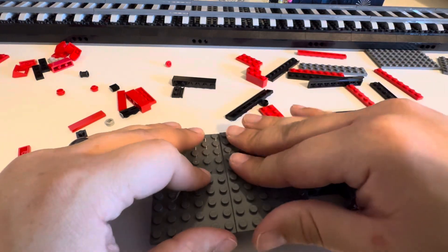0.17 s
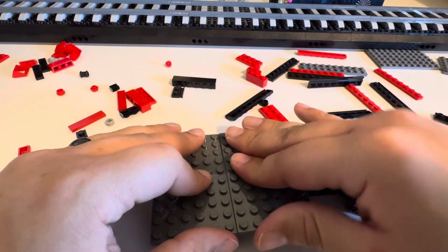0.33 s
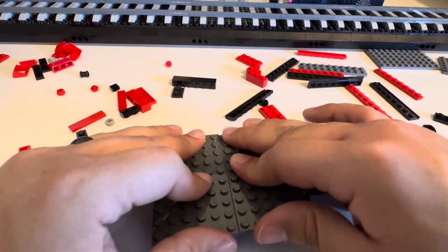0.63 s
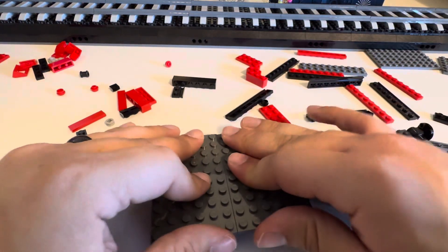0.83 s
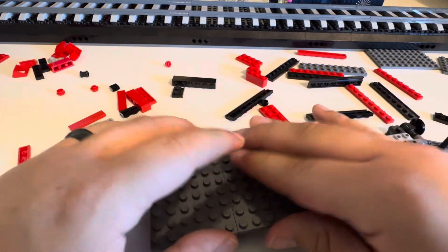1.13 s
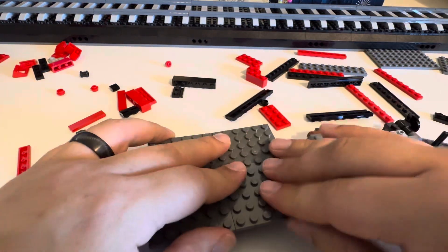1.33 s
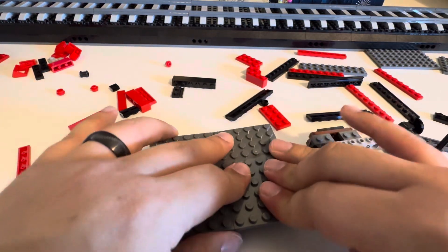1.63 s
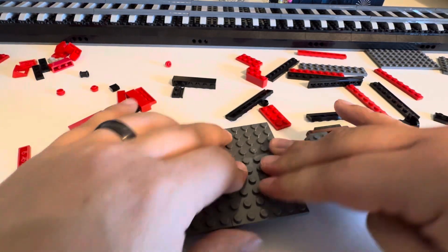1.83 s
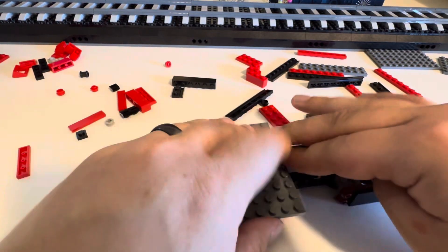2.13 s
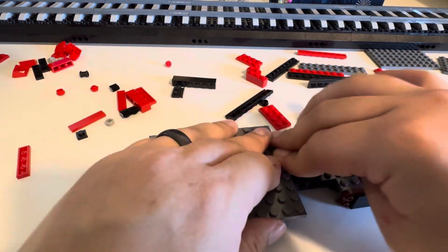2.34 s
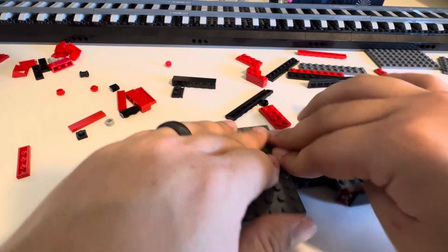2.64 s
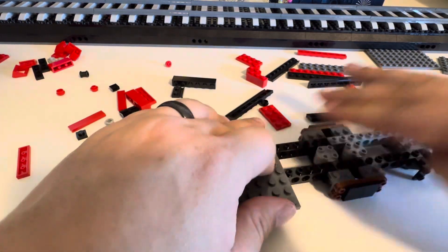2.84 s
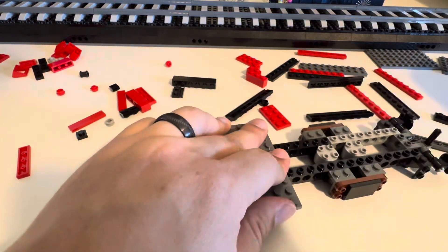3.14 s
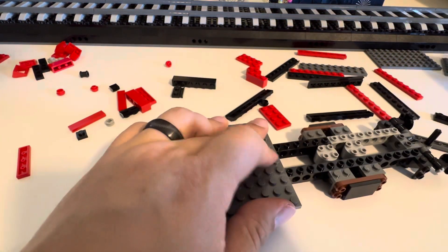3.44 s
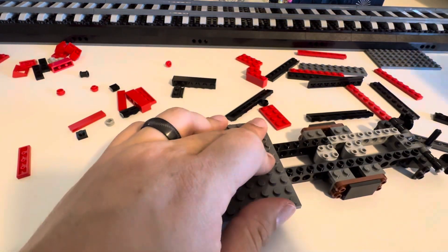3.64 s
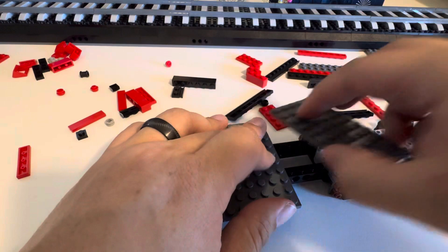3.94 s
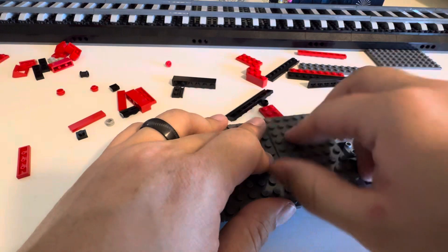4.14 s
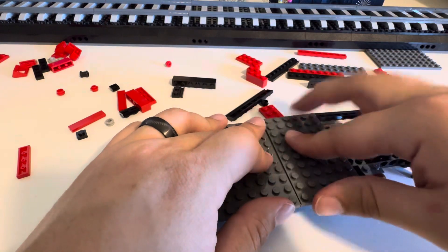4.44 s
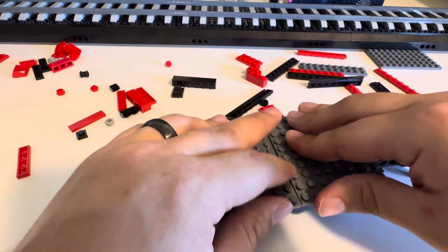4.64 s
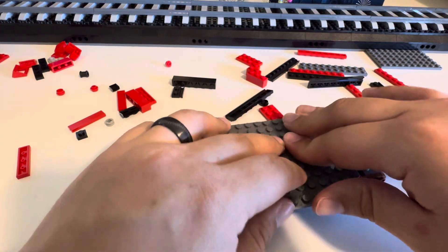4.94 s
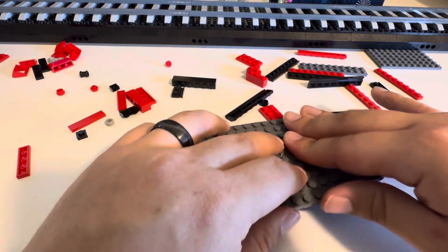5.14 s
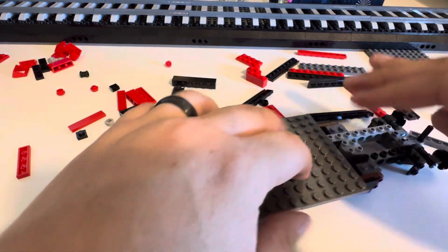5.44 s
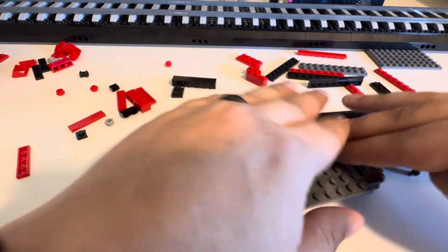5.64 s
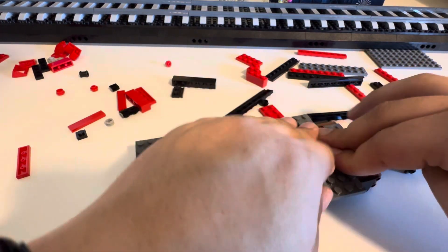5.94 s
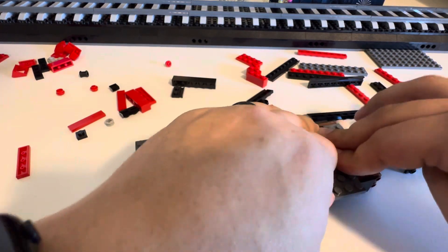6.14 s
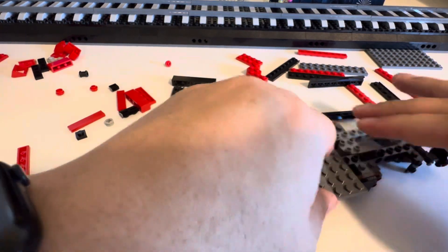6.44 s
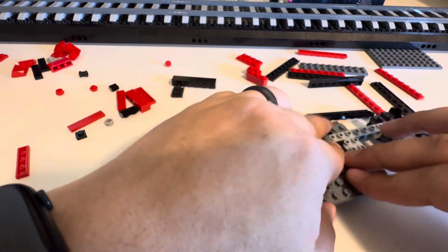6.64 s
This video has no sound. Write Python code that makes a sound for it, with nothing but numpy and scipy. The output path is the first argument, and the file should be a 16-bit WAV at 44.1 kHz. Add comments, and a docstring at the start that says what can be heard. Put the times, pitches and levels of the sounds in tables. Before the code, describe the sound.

A close stereo microphone in a quiet, small room picks up hands fitting plastic plates onto a hollow toy frame. A loud crisp snap comes early, then soft touches, rubs and little ticks. Past the middle a plate lands with a clustered clatter, then a firm thuddy snap follows, and later a lower double knock. Faint handling continues to the end over a low, steady room hush.

```python
"""A small, bare room: at a table, two hands press plastic building plates onto a half-built toy frame.
A stereo microphone stands close by. Studs snap home as noisy bursts of contact that ring plates and frame.
In between, fingers rub as shaped friction noise, plate edges scuff in short rings and a loose piece pings.
Bumps swing the modes of the table top. The room answers with echoes and a decaying tail, over a still floor."""
import sys
import numpy as np
from scipy import signal
from scipy.fft import rfft, irfft, next_fast_len
from scipy.io import wavfile
from scipy.ndimage import uniform_filter1d

SR = 44100
rng = np.random.default_rng(int(sys.argv[2]) if len(sys.argv) > 2 else 0)


def output_pcm(signal):
    """Save a mono or channel-first signal as 16-bit PCM at the path in sys.argv[1].

    Samples are clipped to [-1, 1] before scaling.
    """
    pcm = np.clip(np.atleast_2d(signal).T, -1, 1) * 32767
    wavfile.write(sys.argv[1], SR, np.round(pcm).astype(np.int16))


N = 299439

# a finger lands on the plates and slides; levels are relative, each layer is trimmed later:
# (t/s, length/s, frame body level/dB, plate rasp level/dB, skin hiss level/dB)
FINGER_STROKES = [(0.0, 0.0057, -39.5, -37.5, -65), (0.134, 0.033, -55.5, -59.5, -72),
                  (0.327, 0.01, -55.5, -64.5, -101), (0.392, 0.025, -53, -57.5, -70),
                  (0.509, 0.07, -61, -67, -101), (0.961, 0.04, -43.5, -61.5, -68.5),
                  (1.053, 0.012, -38, -45.5, -73), (1.095, 0.059, -62, -57, -62.5),
                  (1.285, 0.039, -47, -45, -57.5), (1.404, 0.0063, -64.5, -55, -63),
                  (1.612, 0.078, -59.5, -63, -68), (1.7806, 0.097, -47.5, -55.5, -65),
                  (1.931, 0.024, -47, -63, -84), (2.007, 0.05, -43, -57, -68.5),
                  (2.062, 0.041, -52, -61, -64), (2.104, 0.01, -46.5, -49, -72),
                  (2.161, 0.052, -52, -63, -74), (2.429, 0.058, -51.5, -58.5, -93),
                  (2.665, 0.051, -40.5, -47.5, -60.5), (2.7443, 0.04, -39.5, -48.5, -71.5),
                  (3.022, 0.044, -58.5, -57, -83), (3.284, 0.085, -62.5, -68.5, -75),
                  (3.415, 0.057, -54.5, -80, -84), (3.496, 0.015, -87, -70, -64.5),
                  (4.235, 0.043, -72.5, -60, -70), (4.334, 0.05, -55.5, -78, -103),
                  (4.436, 0.0051, -45, -49.5, -88), (4.782, 0.14, -54.5, -67, -80),
                  (5.09, 0.076, -68, -61, -75), (5.182, 0.082, -40, -49, -66),
                  (5.305, 0.12, -55.5, -62, -71), (5.439, 0.012, -42.5, -46.5, -108),
                  (5.909, 0.052, -57.5, -67, -72), (6.038, 0.031, -44, -56.5, -99),
                  (6.176, 0.063, -54, -64, -91), (6.275, 0.054, -37.5, -48, -73),
                  (6.373, 0.059, -56, -75, -91), (6.4555, 0.11, -55, -57.5, -65),
                  (6.546, 0.023, -43, -52, -72), (6.635, 0.14, -75, -62, -76)]


def amp(db):
    """Decibels to gain."""
    return 10 ** (np.asarray(db) / 20)


def evened(x):
    """Scales to rms 1."""
    return x / np.sqrt(np.mean(x ** 2) + 1e-20)


def read(points, hz):
    """Reads a curve of (frequency, value) on a log-frequency axis."""
    f, value = np.transpose(points)
    return np.interp(np.log(hz + 1), np.log(f + 1), value)


def add(mix, s, sound):
    """Mixes a sound in at time s."""
    part = mix[:, max(round(s * SR), 0):][:, :sound.shape[-1]]
    part += sound[..., :part.shape[1]]


def colour(x, points):
    """Causal, minimum-phase filter with the given spectrum."""
    log_gain = np.log(amp(read(points, abs(np.fft.fftfreq(4096, 1 / SR)))))
    minimum_phase = np.exp(np.conj(signal.hilbert(log_gain)))
    taps = np.fft.ifft(minimum_phase).real
    return signal.oaconvolve(x, taps[None], axes=1)[:, :x.shape[1]]


def diffuse(x):
    """Two unrelated signals become alike in the bass, as at two nearby microphone ports."""
    # diffuse sound at the two ports: (f/Hz, left-right likeness from 0 to 1)
    port_likeness = [(50, 0.98), (130, 0.63), (280, 0.24), (550, 0), (1200, 0), (16000, 0)]
    size = next_fast_len(x.shape[1])
    a, b = rfft(x, size)
    same = np.clip(read(port_likeness, np.fft.rfftfreq(size, 1 / SR)), -1, 1)
    mid = a * np.sqrt((1 + same) / 2)
    side = b * np.sqrt((1 - same) / 2)
    return irfft(np.array([mid + side, mid - side]), size)[:, :x.shape[1]]


def ring(modes, t, scatter):
    """Damped modes, with random sign, tuning (by the given fraction) and strength (by 2 dB)."""
    hz, db, t60 = np.transpose(modes)[:, :, None]
    tune, strength = rng.standard_normal((2, len(modes), 1))
    sign = rng.choice([-1, 1], (len(modes), 1))
    decay = amp(db + 2 * strength - 60 * t / t60)
    return (sign * decay * np.sin(2 * np.pi * hz * (1 + scatter * tune) * t)).sum(0)


def resonate(x, hz, sharpness, boost_db):
    """Adds a resonance at hz to the sound; sharpness is its Q."""
    b, a = signal.iirpeak(np.clip(hz, 100, SR / 4), max(sharpness, 1), fs=SR)
    return x + amp(boost_db) * signal.lfilter(b, a, x)


def still_room(level_db=-66.5):
    """The floor of the still room: steady shaped noise, alike at both ports in the bass."""
    # shape of the floor, before it is set to level_db: (f/Hz, relative level per Hz/dB)
    floor_spectrum = [(15, -41), (25, 2), (117, 1), (161, -13.5), (242, -13.5), (734, -23), (2990, -23.5),
                      (3820, -28.5), (4140, -25), (7110, -31), (9840, -32.5), (14800, -44), (16000, -37)]
    noise = diffuse(rng.standard_normal((2, N)))
    return amp(level_db) * evened(colour(noise, floor_spectrum))


def echoes(size):
    """Dull single echoes from the nearest walls, left and right by turns."""
    # first echoes, before the colouring below: (delay/s, level/dB)
    wall_echoes = [(.0125, -13), (.0195, -20.5), (.0245, -16.5)]
    # what the walls do to an echo: (f/Hz, level/dB)
    wall_colour = [(60, 4.5), (300, 5), (900, -5), (2000, -5), (5000, -19.5), (15000, -30)]
    taps = np.zeros((2, size))
    for k, (s, db) in enumerate(wall_echoes):
        near, far = k % 2, 1 - k % 2
        taps[near, round(s * SR)] = amp(db)
        taps[far, round(s * SR) + 12] = amp(db)  # 12 samples later at the far port
    return colour(taps, wall_colour)


def room(x, first_s=0.0062, build_s=0.0067, standing_db=-58):
    """Reflections arrive from the walls in uneven clusters and die band by band; a few low tones hang on."""
    # the diffuse tail: (f/Hz, relative level/dB, t60/s)
    tail_bands = [(62.6, 11, 0.38), (122, 5.5, 0.94), (168, -5.5, 0.52), (234, 7, 0.15), (506, -9.5, 0.89),
                  (810, 3, 0.1), (1055, -2, 0.59), (2100, -6.5, 0.5), (3130, -7.5, 0.49), (5130, -10, 0.5),
                  (9100, -4.5, 0.43), (11300, -15, 0.37), (15000, -22.5, 0.3)]
    # standing waves between the walls, trimmed by standing_db: (f/Hz, relative level/dB, t60/s)
    standing_waves = [(106, -6.5, 0.22), (191.2, -3, 0.67), (284.8, -6.5, 0.57), (389, -3.5, 0.6),
                      (443, -1, 0.59), (520, -12.5, 1), (587, -6, 0.058)]
    t = np.arange(SR * 3 // 4) / SR
    noise = diffuse(rng.standard_normal((2, len(t)))) / np.sqrt(SR)
    hz, frame_s, z = signal.stft(noise, SR, nperseg=512)
    t60 = read([(f, decay) for f, _, decay in tail_bands], hz)[:, None]

    # clusters: 1.8 dB patches in time and frequency, 1.3 dB from frame to frame
    patches = uniform_filter1d(rng.standard_normal(z.shape[1:]), size=5, axis=0)
    patches = uniform_filter1d(patches, size=3, axis=1)
    z *= evened(amp(1.8 * evened(patches) + 1.3 * rng.standard_normal(len(frame_s))))
    # the root keeps a band's energy independent of its decay time
    z *= amp(-60 * frame_s / t60) * np.sqrt(2 * np.log(1000) / t60)

    arrival = 1 - np.exp(-np.maximum(t - first_s, 0) / build_s)
    tail = signal.istft(z, SR, nperseg=512)[1][:, :len(t)] * arrival
    tail = colour(tail, [(f, db) for f, db, _ in tail_bands])
    tail += amp(standing_db) * ring(standing_waves, t, scatter=0) * arrival
    return signal.oaconvolve(x, tail + echoes(len(t)), axes=1)[:, :N]


def bumps(level_db=-7, push_db=-7, rise_s=0.0034):
    """Soft pushes of the frame and of landing fingers set the table top swinging."""
    # the frame bumps the table, trimmed by level_db: (t/s, relative peak level/dB)
    frame_bumps = [(0.638, -18), (0.972, -39), (1.072, -34), (1.294, -31.5), (1.592, -33), (1.795, -35.5),
                   (1.923, -40), (2.176, -33.5), (2.205, -32), (3.41, -43), (4.1, -28), (4.319, -36.5),
                   (4.443, -44), (4.613, -46), (4.811, -21), (5.2, -40), (5.24, -34.5), (5.646, -26.5),
                   (6.173, -41.5), (6.313, -33.5), (6.561, -29.5)]
    # modes of the table top: (f/Hz, relative level/dB, t60/s)
    table_modes = [(62, -14.5, 0.37), (92.4, 2, 0.1), (115.2, 0.5, 0.22), (192, -16.5, 0.029),
                   (258, -21.5, 0.02)]
    out, t = np.zeros((2, N)), np.arange(SR // 3) / SR
    # a finger's push is set against its stroke's body level
    landings = [(s, body_db + push_db) for s, _, body_db, *_ in FINGER_STROKES]
    for s, db in list(frame_bumps) + landings:
        swing = ring(table_modes, t, scatter=0.0088) * (1 - np.exp(-t / rise_s))
        add(out, s, amp(db + level_db) * swing / abs(swing).max())
    return out


def friction(per_s, spread_db, smooth):
    """Skin catches and lets go on the studs: slips of uneven size over a smooth drag."""
    sizes = amp(spread_db * np.minimum(rng.exponential(1, N), 4))
    slips = (rng.random(N) < per_s / SR) * sizes
    catches = evened(slips * rng.standard_normal((2, N)))
    return evened(catches + smooth * rng.standard_normal((2, N)))


def hollow(x, ring_s=0.019, ring_db=-3, half_turns_per_s=2.7):
    """The frame's crowded modes colour the rubbing; three sets trade places as the fingers move over it."""
    t, out = np.arange(2048) / SR, np.zeros_like(x)
    for k in range(3):
        modes = rng.standard_normal(len(t)) * np.exp(-t / ring_s)
        rung = signal.oaconvolve(x, modes[None] / np.linalg.norm(modes), axes=1)[:, :N]
        out += rung * np.cos(np.pi * (half_turns_per_s * np.arange(N) / SR + k / 3))
    return x + amp(ring_db) * out


def lumps(depth_db, lump_s):
    """The drag comes in lumps as the fingers ride over rows of studs."""
    knots = np.arange(0, N / SR + lump_s, lump_s)
    heights = np.clip(rng.standard_normal(len(knots)), -2, 2)
    return amp(depth_db * np.interp(np.arange(N) / SR, knots, heights))


def pressure(length_s, attack_s=0.0014, sag_db=-4.5, release_db_per_s=238.5):
    """A finger grips quickly, eases off as it slides and lets go."""
    t = np.arange(SR // 2) / SR
    eased_db = sag_db * np.minimum(t / length_s, 1)
    eased_db -= release_db_per_s * np.maximum(t - length_s, 0)
    return (1 - np.exp(-t / attack_s)) * amp(eased_db)


def murmur(start_hz=480, end_hz=270, settle_s=0.036, width_hz=130):
    """The frame's main resonance, driven by noise, sinks as each fingertip settles on it."""
    t, hz = np.arange(N) / SR, np.zeros(N)
    for s, *_ in FINGER_STROKES:
        since = t[t >= s] - s
        hz[t >= s] = end_hz + (start_hz - end_hz) * np.exp(-(since / settle_s) ** 2)
    # a double low-pass pole, each of width_hz, then shifted up to the moving pitch
    r = np.exp(-np.pi * width_hz / SR)
    swing = rng.standard_normal((2, N)) + 1j * rng.standard_normal((2, N))
    swing = signal.lfilter([1], [1, -2 * r, r * r], swing)
    tone = (swing * np.exp(2j * np.pi * np.cumsum(hz) / SR)).real
    return evened(diffuse(tone))


def rubs(body_db=-5.5, murmur_db=-6, rasp_db=-3, hiss_db=0):
    """Sliding fingers make the hollow frame murmur, the plates rasp and the skin hiss."""
    # spectra of frame body, plate rasp and skin hiss: (f/Hz, relative level per Hz/dB)
    body_spectrum = [(40, -41.5), (110, 6), (165, -4.5), (240, -8.5), (290, 14.5), (350, -2.5), (560, 5.5),
                     (760, 0.5), (1600, -34.5), (4000, -70)]
    rasp_spectrum = [(300, -33), (700, -18), (860, -8), (1050, 13), (1250, 0), (1550, -6.5), (2400, -0.5),
                     (2900, -12.5), (4500, -15.5), (8000, -25.5), (16000, -43)]
    hiss_spectrum = [(900, -17), (2500, -6.5), (4500, 10), (7000, 1.5), (9500, 5.5), (11500, 3.5),
                     (14200, -1), (16000, -5)]
    gains = np.zeros((3, N))
    for s, length_s, *levels_db in FINGER_STROKES:
        add(gains, s, amp(levels_db)[:, None] * pressure(length_s))
    body, rasp, hiss = gains
    body, rasp = np.array([body, rasp]) * evened(lumps(depth_db=3.2, lump_s=.016))

    drag = hollow(diffuse(friction(per_s=300, spread_db=-0.5, smooth=0.14)))
    catches = hollow(diffuse(friction(per_s=260, spread_db=2.5, smooth=.3)))
    fine = friction(per_s=600, spread_db=0.0, smooth=0.6)
    frame = amp(body_db) * evened(colour(drag, body_spectrum)) + amp(murmur_db) * murmur()
    plates = amp(rasp_db) * evened(colour(catches, rasp_spectrum))
    skin = amp(hiss_db) * evened(colour(fine, hiss_spectrum))
    return body * frame + rasp * plates + hiss * skin


def scuffs(slips_per_s=330, unevenness=0.39, sharpness=6, sag=0.15):
    """A skidding edge sticks and slips in uneven steps; each slip rings the plate, lower as it slows."""
    # a plate's edge skids over studs and sings: (t/s, length/s, middle pitch f/Hz, rms level/dB)
    edge_skids = [(0.0, 0.035, 2310, -59.5), (1.049, 0.021, 2850, -56.5), (1.411, 0.014, 3270, -57.5),
                  (1.78, 0.026, 726, -52), (5.22, 0.024, 1588, -57.5), (5.238, 0.3, 1000, -72.5),
                  (5.267, 0.2, 2090, -74), (5.388, 0.16, 302, -59), (5.434, 0.041, 890, -61),
                  (5.451, 0.023, 1660, -60), (6.275, 0.026, 3260, -64)]
    out = np.zeros((2, N))
    t = np.arange(1024) / SR
    for s, length_s, hz, db in edge_skids:
        skid = np.zeros((2, round(length_s * SR) + len(t)))
        gaps, sizes, detune, pan = rng.standard_normal((4, 200))
        # places run from 0 to 1 along the skid
        places = np.cumsum(np.exp(unevenness * gaps)) / (slips_per_s * length_s)
        for place, size, tune, side in zip(places[places < 1], sizes, detune, pan):
            ring_hz = hz * (1 - sag * (place - .5) + .04 * tune)
            phase = 2 * np.pi * ring_hz * t + np.array([[.5], [-.5]]) * side
            fade = np.exp(-np.pi * hz * t / sharpness) * (1 - np.exp(-2 * hz * t))
            strength = np.sqrt(np.sin(np.pi * place)) * amp(2 * size)
            add(skid, place * length_s, strength * np.sin(phase) * fade)
        rms = np.sqrt((skid ** 2).sum() / (2 * length_s * SR) + 1e-20)
        add(out, s, amp(db) * skid / rms)
    return out


def ping():
    """A small loose piece is flicked and rings on in one clear mode."""
    # the flick: (t/s, f/Hz, level/dB, t60/s)
    loose_piece = (1.951, 1276, -52, 0.2)
    s, hz, db, t60 = loose_piece
    out, t = np.zeros((2, N)), np.arange(SR // 4) / SR
    add(out, s, amp(db - 60 * t / t60) * np.sin(2 * np.pi * hz * t))
    return out


def bands(sound, levels_db):
    """Gives each band of a click its level over the first 10 ms."""
    # ranges of thud, knock, clack and tick: (low f/Hz, high f/Hz)
    click_ranges = [(150, 640), (790, 2000), (2000, 6800), (7000, 16000)]
    out = np.zeros_like(sound)
    for db, limits in zip(levels_db, click_ranges):
        sos = signal.butter(4, limits, "band", fs=SR, output="sos")
        part = signal.sosfilt(sos, sound)
        out += amp(db) * part / np.sqrt(np.mean(part[:, :SR // 100] ** 2, axis=1, keepdims=True))
    return out


def click(levels_db, hz, chatter_s, ring_db=-34, swell=0.54, lag_s=.00012):
    """A stud slips and seats: tiny impacts, then a short settling, ring the piece, plates and frame.
    Returns the direct sound and the smoother sound that is radiated all round."""
    # modes of the plates: (f/Hz, relative level/dB, t60/s)
    plate_modes = [(289.4, -7, .08), (537, -3, 0.06), (1072, 1.5, 0.034), (1220, -4, 0.02),
                   (1537, 3.5, 0.027), (1823, -1.5, .022), (2350, -7, 0.03), (3090, -6.5, 0.022),
                   (3660, -6, 0.018)]
    # each piece draws its own high modes in this range: (lowest f/Hz, highest f/Hz)
    overtone_range = (2200, 9000)
    t, chatter_s = np.arange(4096) / SR, np.clip(chatter_s, .0005, .006)
    settle, settle_s = .08, .008
    grip = np.exp(-t / chatter_s) + settle * np.exp(-t / settle_s)
    grip *= 1 - np.exp(-t / (swell * chatter_s))
    burst = rng.standard_normal((2, len(t))) * grip
    for _ in range(2):  # hard contacts excite all frequencies about evenly
        burst = irfft(np.exp(1j * np.angle(rfft(burst)))) * grip
    contact = burst[0] + np.array([[.5], [-.5]]) * burst[1]

    plates = ring(plate_modes, t, scatter=0.084)
    ringing = signal.fftconvolve(contact, plates[None], axes=1)[:, :len(t)]
    direct = resonate(contact + amp(ring_db) * ringing, hz, sharpness=5, boost_db=4)
    all_round = resonate(signal.unit_impulse(len(t))[None], hz, sharpness=5, boost_db=-3)
    for overtone_hz in np.exp(rng.uniform(*np.log(overtone_range), size=5)):
        direct = resonate(direct, overtone_hz, sharpness=20, boost_db=3)
        all_round = resonate(all_round, overtone_hz, sharpness=14, boost_db=-12)
    # every click also wakes the hollow frame's lowest mode
    direct = resonate(direct, hz=267, sharpness=11, boost_db=-1)
    all_round = resonate(all_round, hz=267, sharpness=11, boost_db=-1)

    left, right = bands(direct, levels_db)
    right = np.pad(right, (round(abs(lag_s) * SR), 0))[:len(t)]  # the left port is nearer
    return np.array([left, right]), bands(all_round, levels_db)


def touches(hz=1050, chatter_s=0.003, room_db=-4):
    """Each stroke starts with a dull touch of the fingertip, in rows like those of the snaps."""
    # the touch against its stroke: (thud to body level/dB, knock to rasp level/dB,
    # clack to rasp level/dB, tick to hiss level/dB)
    landing_levels = (-8.5, -7.5, -18, -11)
    rows = []
    for s, _, body_db, rasp_db, hiss_db in FINGER_STROKES:
        levels_db = np.add((body_db, rasp_db, rasp_db, hiss_db), landing_levels)
        rows.append((s, *levels_db, hz, chatter_s, room_db))
    return rows


def clicks(level_db=-4.5, radiated_db=-3.0):
    """Every snap, tick and touch, towards the microphone and towards the walls."""
    # snaps and ticks of plastic, levels before the trims above: (t/s, thud level/dB, knock level/dB,
    # clack level/dB, tick level/dB, struck piece f/Hz, contact chatter/s before limits, extra room level/dB)
    plastic_clicks = [(0.422, -54, -44.5, -49.5, -52.5, 1500, 0.0013, -5.5),
                      (0.6257, -20, -15.5, -15.5, -24.5, 1520, 0.0011, 1.5),
                      (1.0264, -75.0, -52, -48.5, -53, 3400, 0.0034, 9),
                      (1.0608, -44.5, -61, -63, -80, 890, 0.00068, 0.5),
                      (1.1446, -53, -52, -47.5, -46, 3530, 0.002, 0.5),
                      (1.2981, -32.5, -44, -43.5, -55, 1190, 0.0024, -6),
                      (1.3453, -61, -55.5, -57, -53, 1530, 0.0055, 5),
                      (1.4126, -56, -44.5, -52.5, -60.0, 1120, 0.003, -6),
                      (1.4985, -54, -53.5, -53, -57, 1510, 0.002, 1),
                      (1.5882, -38, -43.5, -50.5, -57, 1055, 0.0034, -4),
                      (1.7859, -48.5, -54, -72, -86, 730, 0.0057, -1),
                      (1.855, -61, -55, -53.5, -49, 1513, 0.0082, -1),
                      (1.9159, -54, -59, -64.0, -57.5, 1200, 0.0022, -14),
                      (1.9498, -55, -65, -57.5, -78.0, 2400, 0.0069, 5),
                      (2.019, -53, -49.5, -67, -78.0, 1010, 0.0066, 4.5),
                      (2.1119, -52, -46, -59, -71, 1111, 0.0062, 5),
                      (2.1917, -50.5, -52.5, -62, -54.5, 906, 0.0029, -2.5),
                      (2.2512, -57, -54.5, -57, -61, 1445, 0.0063, 2),
                      (2.3297, -61.5, -54, -54, -68, 1366, 0.00082, 7),
                      (2.6235, -52.5, -47.5, -52, -56.0, 1105, 0.0037, 7.5),
                      (2.761, -52, -48, -53, -67, 769, 0.0047, 8),
                      (2.9744, -62.5, -69.5, -57, -65, 2340, 0.0031, 12),
                      (3.3452, -63, -62.5, -46, -46.5, 4780, 0.002, 1.5),
                      (3.3618, -60.0, -45, -39.5, -51.5, 1699, 0.0022, -2),
                      (3.3924, -50.5, -57, -50, -61, 3700, 0.0033, 1.5),
                      (4.0085, -40.5, -45, -46, -50.0, 2170, 0.0037, 2),
                      (4.0823, -32, -32.5, -31, -52.0, 1490, 0.0028, 8),
                      (4.1, -25, -18.5, -25.5, -26.5, 1190, 0.0039, -5),
                      (4.1253, -34, -32, -31, -40, 1840, 0.0025, -27),
                      (4.1288, -39, -25.5, -35, -52.0, 1980, 0.0032, -11),
                      (4.1471, -26.5, -25, -30.5, -42.5, 1860, 0.0023, -17),
                      (4.212, -41, -32.5, -49, -58, 1510, 0.0025, -20),
                      (4.4044, -53, -51.5, -65, -90, 1310, 0.0019, -36.5),
                      (4.4395, -58, -54, -58, -65.5, 1463, 0.0035, -7),
                      (4.6047, -61.5, -60.5, -64, -64, 1574, 0.0033, 1),
                      (4.7167, -58.5, -53, -56.5, -64, 1500, 0.0023, -0.5),
                      (4.8109, -18.5, -23.5, -28.5, -35.5, 1094, 0.0018, -7),
                      (5.1869, -59.5, -55, -53.5, -73, 2650, 0.0058, 6.5),
                      (5.2202, -53, -56, -51.5, -49, 2900, 0.0064, 7),
                      (5.3896, -56.5, -55, -51, -64, 2495, 0.006, -12),
                      (5.6139, -61, -51.5, -52, -59, 2950, 0.0051, 13.5),
                      (5.6277, -27, -25, -45, -61, 1385, 0.0042, -5.5),
                      (5.6337, -31.0, -34.5, -47, -57, 1570, 0.00083, -8),
                      (5.6459, -33, -30.5, -45.0, -64, 1310, 0.0012, -19),
                      (5.651, -29.5, -56, -54, -60, 930, 0.005, -6.5),
                      (5.6953, -48.5, -55.5, -43, -56, 4060, 0.0033, -14),
                      (5.7109, -44, -49, -54, -58, 4520, 0.0075, -3),
                      (5.9132, -60, -56, -83, -80, 1103, 0.003, 2.5),
                      (5.9545, -53, -44, -60, -84, 1188, 0.0029, -0.5),
                      (5.9704, -50, -47.5, -61, -69, 1080, 0.0036, 0),
                      (5.9944, -61, -47.5, -67, -81, 1088, 0.0028, -12),
                      (6.0438, -52, -48, -67, -90, 833, 0.0041, -1.5),
                      (6.1776, -53, -55, -77, -74, 1180, 0.0035, 1),
                      (6.206, -39.5, -39, -46.5, -50, 1290, 0.003, -4),
                      (6.3482, -52.5, -52, -61, -58, 922, 0.0012, 3),
                      (6.4706, -49, -55, -57.5, -72, 678, 0.0026, 5),
                      (6.556, -38.5, -42.5, -62, -69, 790, 0.0022, -4),
                      (6.684, -54.5, -50.5, -50, -78, 2260, 0.0083, 2.5),
                      (6.751, -60, -51, -50.5, -77, 4160, 0.00066, 5)]
    direct, radiated = np.zeros((2, N)), np.zeros((1, N))
    for s, *levels_db, hz, chatter_s, room_db in list(plastic_clicks) + touches():
        near, all_round = click(levels_db, hz, chatter_s)
        add(direct, s, near)
        add(radiated, s, amp(room_db) * all_round)
    return amp(level_db) * direct, amp(radiated_db) * radiated


def scene(rub_room_db=-10, bump_room_db=-12):
    """Plastic, fingers and table, close to the microphone in the still room."""
    plastic, radiated = clicks()
    fingers = rubs() + scuffs() + ping()
    table = bumps()
    # the left side of fingers and table stands for what reaches the walls
    to_walls = radiated + amp(rub_room_db) * fingers[:1] + amp(bump_room_db) * table[:1]
    return plastic + fingers + table + room(to_walls) + still_room()


def record(dry):
    """Port resonances colour each side in its own way, loud peaks are rounded off, then the band ends."""
    # the left port against the right, shared half and half: (f/Hz, level/dB)
    port_difference = [(100, 0.5), (2400, 2.5), (3800, 6), (5500, 7), (8000, 0.5), (14000, -2)]
    # response common to both ports: (f/Hz, level/dB)
    microphone_response = [(20, -2), (70, 2.5), (4000, 0.5), (5500, -3), (7500, -5.5), (8700, -3),
                           (9900, -3), (10800, 8.5), (11700, 9.5), (12400, -2), (12800, -7.5), (13500, 8),
                           (14700, 5), (15700, -7.5)]
    sides = []
    for x, sign in zip(dry, (1, -1)):
        side_response = [(hz, sign * db / 2) for hz, db in port_difference]
        sides.append(colour(x[None], side_response)[0])
    heard = np.tanh(colour(np.array(sides), microphone_response))
    low_pass = signal.firwin(511, 16300, window=("kaiser", 9), fs=SR)  # band edge in Hz
    return signal.oaconvolve(heard, low_pass[None], "same")


dry = scene()
out = record(dry)
output_pcm(out)
```